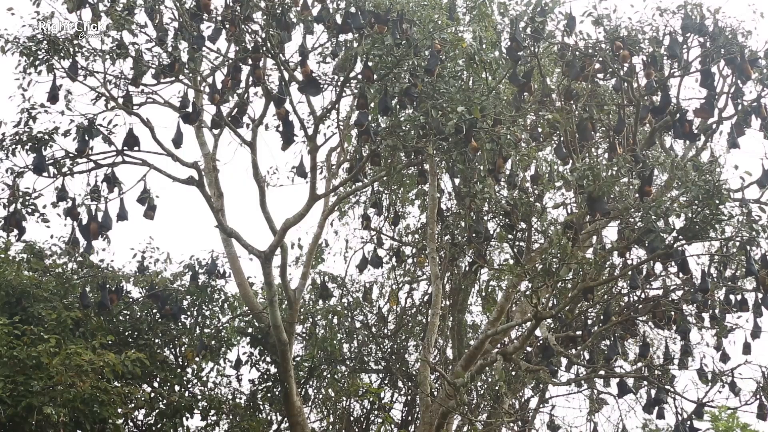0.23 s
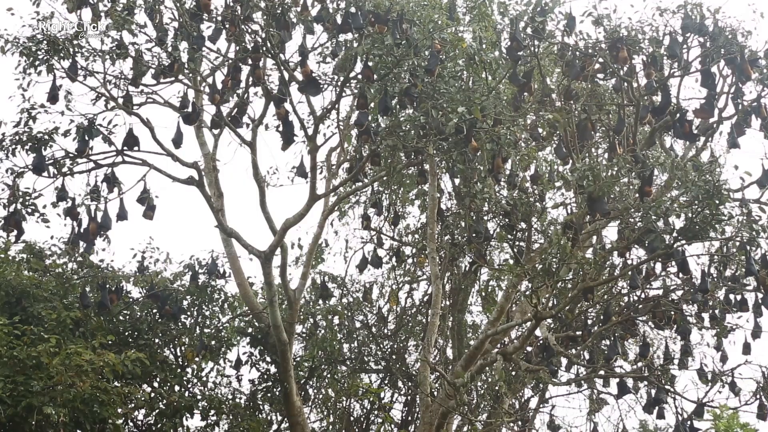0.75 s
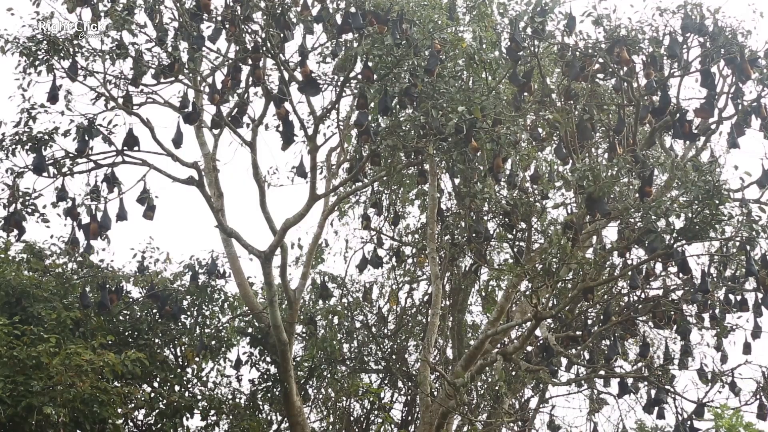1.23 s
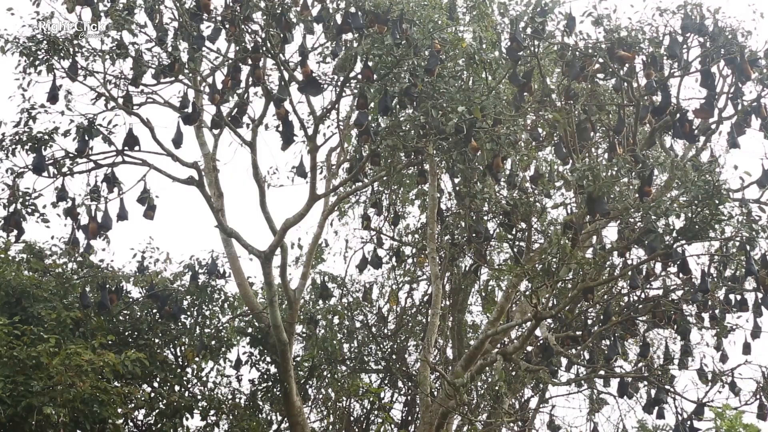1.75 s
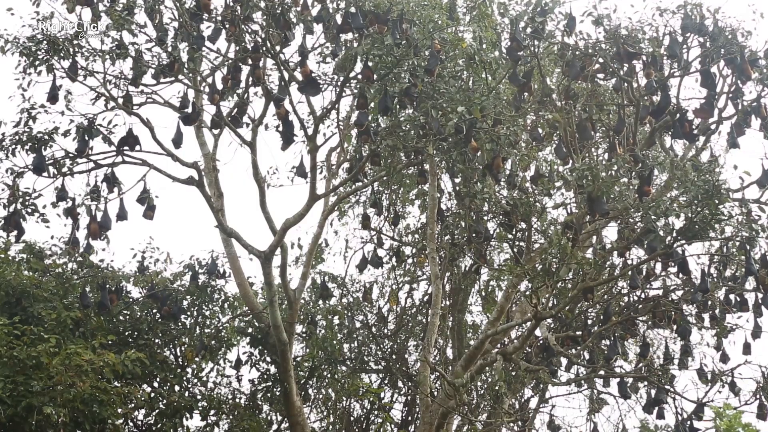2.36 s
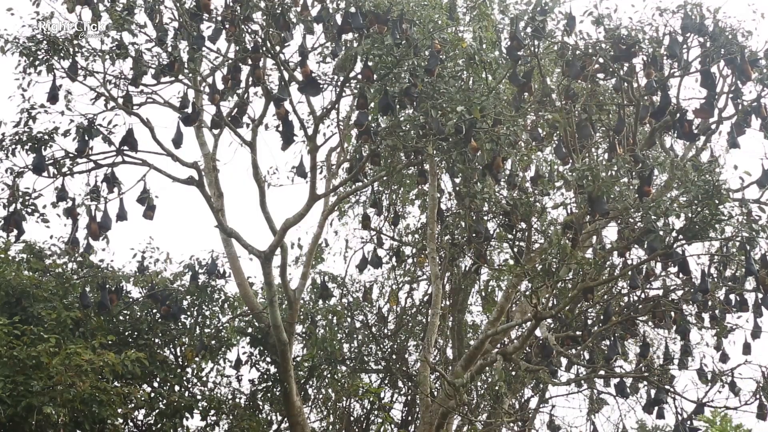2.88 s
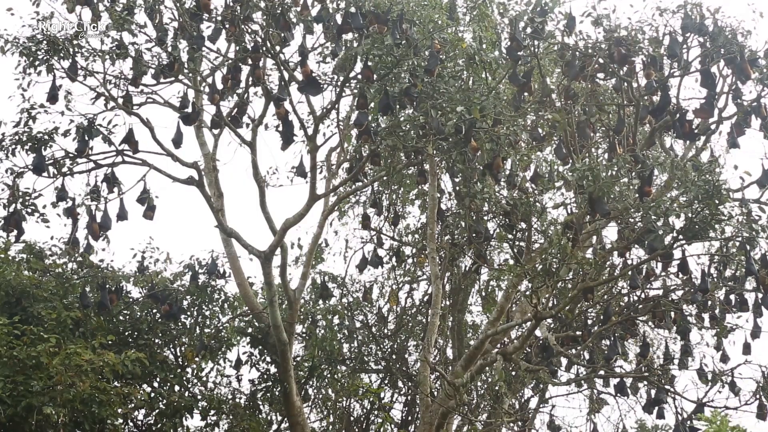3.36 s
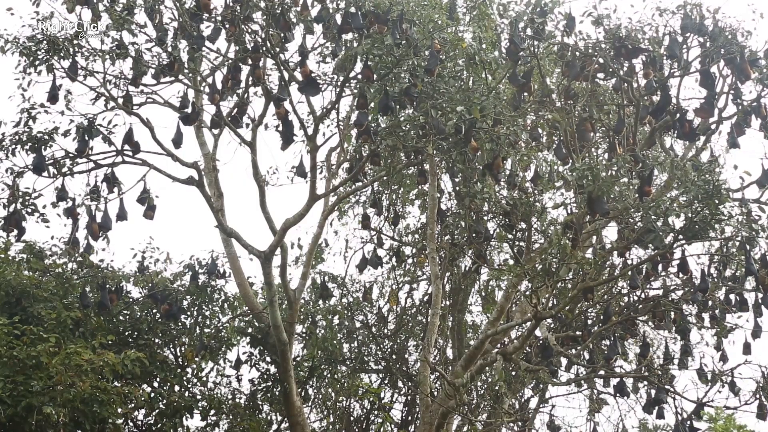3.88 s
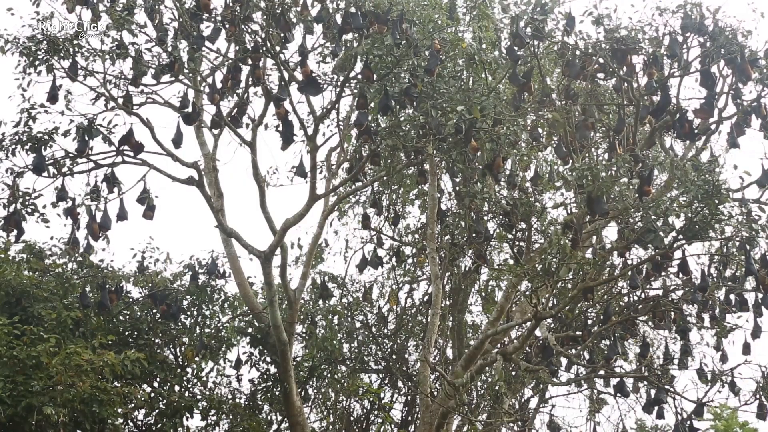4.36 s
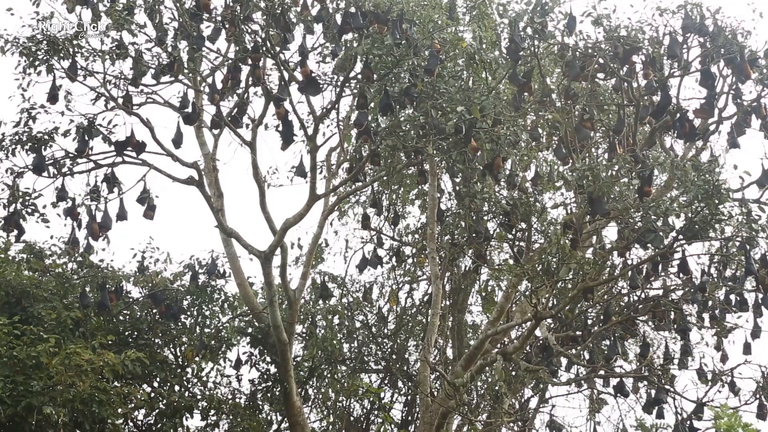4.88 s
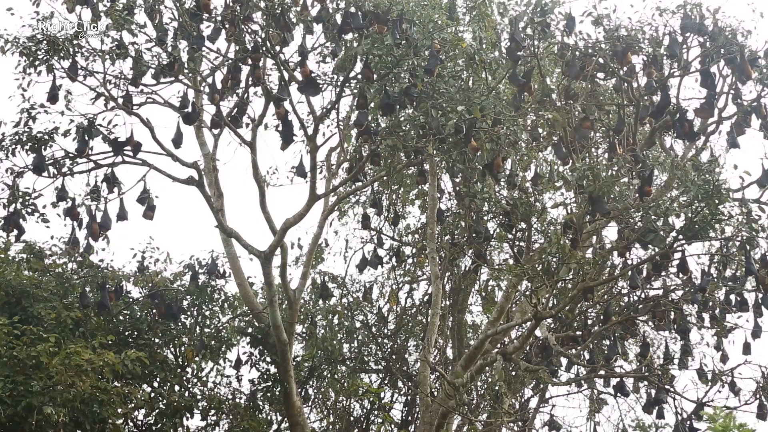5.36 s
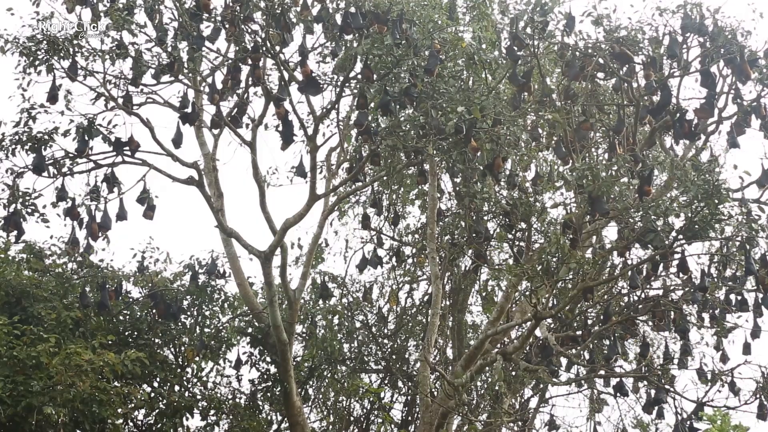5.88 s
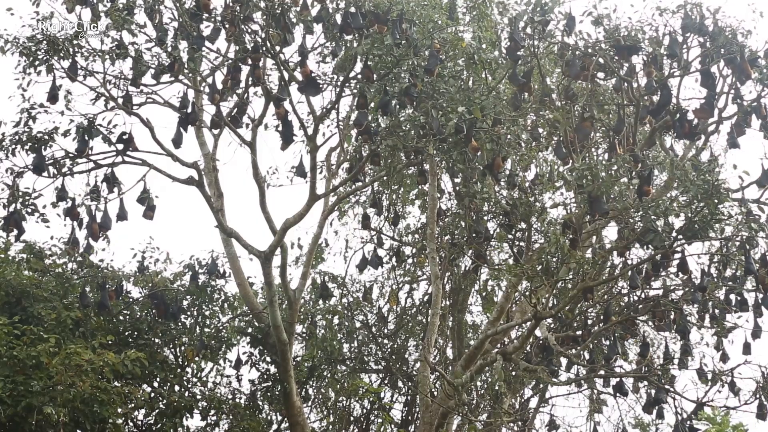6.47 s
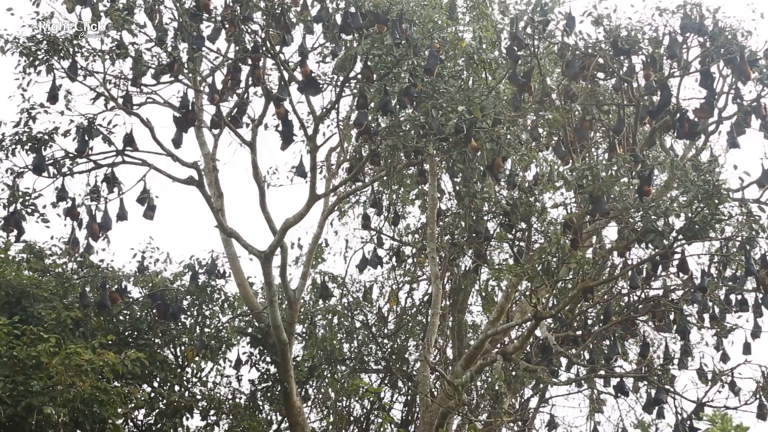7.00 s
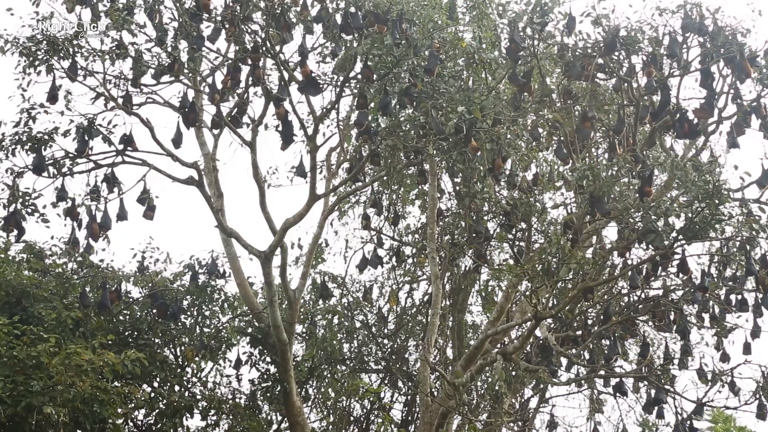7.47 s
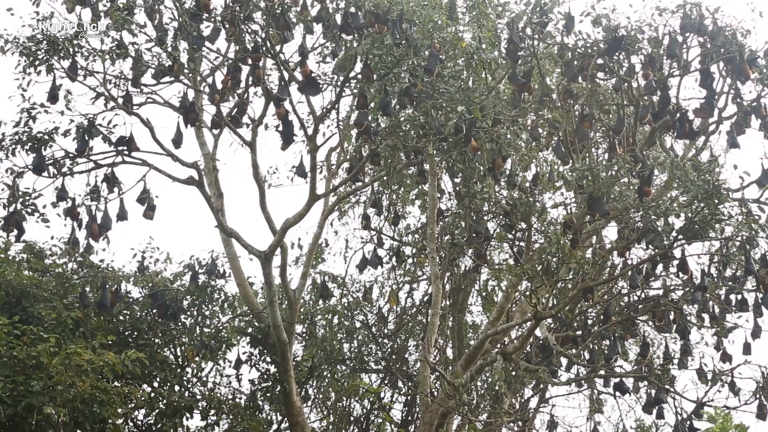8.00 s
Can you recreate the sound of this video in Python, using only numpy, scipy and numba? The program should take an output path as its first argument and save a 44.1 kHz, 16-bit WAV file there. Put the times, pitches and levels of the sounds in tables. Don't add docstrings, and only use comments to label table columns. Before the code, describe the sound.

A fruit bat roost outdoors, heard in mono from below, with steady high cicada buzz, soft air, distant traffic and a blurred far colony throughout. A bat mutters faintly, chirps upward at 0.2 s with a raspy open screech, and whistles downward at 0.5. A wavering chirp and muttering run from 0.7, then a loud bark near 1.05 and a long, piercing screech from 1.3 to 1.8. A short call at 1.95 leads to a quieter gap with faint whistles. From 2.3 a second, hoarser bat takes over: harsh screeches at 2.9, 3.3 and 3.9, strongest around 4.5, with low grunts between. Squeals and a falling whistle appear around 4.9 to 5.2, a lower rough caw at 5.4, softer squeals near 5.8. Choppier, weaker cries follow around 6 to 7, swelling again at 7.3 to 8, with a grunt and final bark around 8.2. Leaves give a brief, dense echo.

```python
import sys
import numpy as np
from scipy import signal
from scipy.io import wavfile
from scipy.ndimage import uniform_filter1d
from numba import njit

SR = 44100
rng = np.random.default_rng(int(sys.argv[2]) if len(sys.argv) > 2 else 0)


def linear_from_db(decibels):
    return 10 ** (np.asarray(decibels, float) / 20)


def inscribe(sig):
    pcm = np.round(np.clip(np.atleast_2d(sig).T, -1, 1) * 32767)
    wavfile.write(sys.argv[1], SR, pcm.astype(np.int16))


N = 362942

# (time [s], third partial [Hz], its level [dB])
SQUEALS = [
    [(2.765, 3900, -60), (2.83, 3880, -60)],
    [(4.893, 4150, -47), (4.93, 3900, -45), (4.978, 3960, -46)],
]
SOFT_SQUEALS = [
    [(5.725, 4100, -49), (5.79, 4050, -50)],
    [(5.838, 4300, -48), (5.89, 4450, -48)],
]

SMALL_HEAD_HZ = 1390
EFFORT_DB = -30
BARK_DB_PER_S, SURGE_DB_PER_S = 1700.0, 330
RELEASE_DB_PER_S, SAG_DB_PER_S = 376, 4.5


def level(x, db):
    return x * linear_from_db(db) / np.sqrt(np.mean(x ** 2))


def walk(rate):
    k = int(SR / rate)
    steps = np.repeat(rng.standard_normal(N // k + 1), k)
    return 1.3 * uniform_filter1d(uniform_filter1d(steps, k), k)[:N]


@njit
def svf(x, hz, width):
    y, b, l = np.empty(len(x)), 0., 0.
    for i in range(len(x)):
        g = np.tan(np.pi * hz[i] / SR)
        k = width / hz[i]
        v = (b + g * (x[i] - l)) / (1 + g * (g + k))
        b, l, y[i] = 2 * v - b, l + 2 * g * v, k * v
    return y


def ring(x, modes, patchy_db=0):
    out = 0
    for k, (hz, width_hz, db) in enumerate(modes):
        centre = np.full(N, float(hz))
        once = svf(x, centre, float(width_hz))
        twice = svf(once, centre, float(width_hz))
        flicker = patchy_db * walk(45)
        out = out + (-1) ** k * linear_from_db(db + flicker) * level(twice, 0)
    return out


def play(calls, fade_s=0.0052):
    t = np.arange(N) / SR
    gate = sum(np.clip(np.minimum(t - c[0][0], c[-1][0] - t) / fade_s, 0, 1) for c in calls)
    s, *columns = np.concatenate(calls).T
    order = np.argsort(s)
    return [gate] + [np.interp(t, s[order], c[order]) for c in columns]


def tone(calls, partials, tracked, wobble=0.0054):
    gate, hz, db = play(calls)
    phase = 2 * np.pi * np.cumsum(hz * (1 + wobble * walk(150))) / (tracked * SR)
    stack = sum(linear_from_db(p_db + 2.8 * walk(60)) * np.sin(k * phase) for k, p_db in partials)
    return gate * linear_from_db(db) * np.sqrt(2) * stack


@njit
def snaps(hz, stretch, size):
    pulses, phase, p, k = np.zeros(len(hz) + 1), np.empty(len(hz)), 0., 0
    for i in range(len(hz)):
        step = hz[i] * stretch[k] / SR
        p += step
        if p >= 1:
            p, k = p - 1, k + 1
            pulses[i] += size[k] * p / step
            pulses[i + 1] += size[k] * (1 - p / step)
        phase[i] = p
    return pulses[:-1], phase


def folds(hz, jitter, weak_db, scatter_db):
    cycles = N // 40
    chance = np.tanh(rng.standard_normal((cycles, 2)).T)
    bouts = np.repeat(rng.random(cycles), 9)[:cycles]
    chance = chance * (.35 + 1.5 * bouts ** 2)
    size = linear_from_db(scatter_db * chance[1] + weak_db * (np.arange(cycles) % 2))
    pulses, phase = snaps(hz, np.clip(1 + jitter * chance[0], .5, 2), size)
    puffs = linear_from_db(2.05 * walk(25)) * np.exp(-phase / 0.92) * rng.standard_normal(N)
    return -level(pulses, 0), level(puffs, 0)


def air():
    # (frequency [Hz], level [dB per Hz])
    air_colour = [(20, -32), (45, -5), (100, -4), (300, -4), (700, -3), (1500, -6.5), (3300, -8.5),
                  (6000, -8), (9000, -14.5), (10200, -24.5), (13000, -18.5), (15800, -25.5)]
    # (centre [Hz], width [Hz], level [dB])
    far_roost = [(2540, 430, -57.5), (4120, 100, -76.5), (315, 104, -65), (510.4, 94, -65)]
    out, (hz_at, db_at) = 0, np.transpose(air_colour)
    for hz in 30 * 2 ** np.arange(0, 9.1, 1 / 3):
        db = np.interp(np.log(hz), np.log(hz_at), db_at) + 10 * np.log10(hz) + 1.7 * walk(9)
        out = out + linear_from_db(db) * ring(rng.standard_normal(N), [(hz, hz * 0.49, 0)])
    roost = sum(linear_from_db(2.5 * walk(5)) * ring(rng.standard_normal(N), [m]) for m in far_roost)
    return level(out, -47) + roost


def cicadas():
    # (centre [Hz], width [Hz], level [dB])
    bodies = [(5237, 480, -49), (8640, 1280, -46.5), (6960, 880, -52.5)]
    out = 0
    for body in bodies:
        clicks = (rng.random(N) < 900 / SR) * rng.standard_normal(N)
        clicks = clicks + 0.28 * rng.standard_normal(N)
        out = out + linear_from_db(0.16 * walk(1.8) + 1.9 * walk(40)) * ring(clicks, [body])
    return out


def leaf_echo(bats):
    t = np.arange(SR // 4) / SR
    t60_s = 0.096
    leaves = rng.standard_normal(len(t)) * linear_from_db(-60 * t / t60_s) * np.clip(t / 0.001, 0, 1)
    echo = signal.fftconvolve(bats, leaves / np.sqrt(np.sum(leaves ** 2)))[:N]
    return linear_from_db(-6) * echo


def caw():
    # (time [s], second partial [Hz], level [dB])
    caw_path = [
        [(5.36, 1030, -54), (5.42, 1188, -50), (5.5, 1105, -53), (5.58, 975, -55), (5.615, 826, -57),
         (5.64, 800, -63)],
    ]
    # (multiple, level [dB])
    caw_partials = [(1.8, -5), (2, 0), (2.5, -8), (3, -2), (3.5, -5), (4, -4), (8, -9)]
    return tone(caw_path, caw_partials, tracked=2)


def whistles():
    # (time [s], frequency [Hz], level [dB])
    whistle_paths = [
        [(0.5, 2720, -44), (0.53, 2680, -42), (0.565, 2480, -45)],
        [(2.15, 4060, -58), (2.24, 4000, -60)],
        [(2.605, 4400, -56), (2.65, 4430, -53), (2.69, 4250, -54)],
        [(5.105, 4400, -54), (5.14, 3700, -51), (5.18, 3150, -51)],
    ]
    return tone(whistle_paths, [(1, 0)], tracked=1)


def chirps():
    # (time [s], frequency [Hz], level [dB])
    chirp_paths = [
        [(0.17, 2370, -40), (0.184, 2457, -37), (0.215, 2740, -33)],
        [(0.735, 2980, -45), (0.84, 2930, -44), (0.885, 2980, -38), (0.91, 2900, -45), (1.03, 2860, -42),
         (1.19, 2760, -47)],
    ]
    return tone(chirp_paths, [(1, 1.0), (2, -12), (3, -19)], tracked=1, wobble=0.0157)


def grunts():
    # (start [s], level [dB], length [s], fold rate [Hz])
    in_breaths = [(1.122, -40, 0.085, 180.4), (3.176, -36, 0.078, 171), (3.676, -40.5, 0.067, 170.6),
                  (4.217, -38, 0.045, 177.2), (4.678, -41, 0.082, 176.7), (5.929, -39.5, 0.057, 180.5),
                  (6.105, -48, 0.14, 174.5), (7.194, -34.5, 0.08, 174.3), (8.035, -37, 0.15, 177)]
    gulp = [
        (1.92, -38.5, 0.014, 173.5),
    ]
    # (centre [Hz], width [Hz], level [dB])
    grunt_throat = [(504, 530, -3.5), (1015, 340, -2), (2340, 2400, 5)]
    t = np.arange(N) / SR
    s, db, length, hz = np.transpose(sorted(in_breaths + gulp))
    shape = 0
    for start, d, n in zip(s, db, length):
        shape = shape + linear_from_db(d - 9.0) * np.sin(np.pi * np.clip((t - start) / n, 0, 1)) ** 2
    flaps, puffs = folds(np.interp(t, s, hz), 0.033, 0, 0.72)
    return shape * ring(flaps + 1.25 * puffs, grunt_throat)


def squeals():
    # (multiple, level [dB])
    squeal_partials = [(1, -9), (2, -1), (3, 0), (4, 2), (5, -14), (6, -3), (7, -15), (8, -11), (9, -14),
                       (10, -17)]
    # (multiple, level [dB])
    soft_partials = [(1, -9), (2, 1), (3, 0), (4, -8)]
    clean = tone(SQUEALS, squeal_partials, tracked=3)
    return clean + tone(SOFT_SQUEALS, soft_partials, tracked=3)


def effort(rows, rise):
    ms = np.arange(0, N / SR + 1 / 1000, 1 / 1000)
    s, held, db, *mouth = (c[:, None] for c in np.transpose(rows))
    shape = np.minimum(rise[:, None] * (ms - s), -SAG_DB_PER_S * (ms - s))
    release = RELEASE_DB_PER_S * np.clip(ms - s - held, 0, None)
    power = linear_from_db(2 * (db + shape - release))
    total = power.sum(axis=0)
    curves = [10 * np.log10(total)] + [(power * c).sum(axis=0) / total for c in mouth]
    return [np.interp(np.arange(N) / SR, ms, c) for c in curves]


def screech(curves, source, breath, chest, rasp, low_width_hz, high_width_hz):
    gate, db, low_hz, high_hz, nose_db, high_db, rasp_db = curves
    low_hz = low_hz * (1 + .012 * walk(60))
    high_hz = high_hz * (1 + .02 * walk(60))
    pulses, puffs = source
    deep, airy = pulses + breath * puffs, pulses + 2.44 * breath * puffs
    low = svf(svf(deep, low_hz, low_width_hz), low_hz, 3 * low_width_hz)
    low = level(low, -0.32) - ring(deep, chest, patchy_db=3.0)
    nose = -ring(airy, [(3940, 1180, -2)], patchy_db=4.0)
    high = svf(svf(airy, high_hz, high_width_hz), high_hz, 3 * high_width_hz)
    high = linear_from_db(1.35 * walk(40)) * level(high, 0)
    voice = low + linear_from_db(nose_db) * nose + linear_from_db(high_db) * high
    voice = voice - linear_from_db(rasp_db) * ring(airy, rasp, patchy_db=1.5)
    head = signal.butter(6, SMALL_HEAD_HZ, "high", fs=SR, output="sos")
    voice = signal.sosfilt(head, voice)
    size = uniform_filter1d(np.abs(voice), SR // 50)
    band = signal.butter(3, [SMALL_HEAD_HZ, 8000], "band", fs=SR, output="sos")
    voice = voice - .14 * signal.sosfiltfilt(band, voice ** 2 / size)
    return gate * linear_from_db(db + 0.7 * walk(22)) * voice


def first_jaw():
    # (full strength [s], held [s], level [dB], low throat [Hz], high throat [Hz])
    pushes = [
        (0.0, .04, -47, 2900, 4500),
        (0.65, .03, -37, 2900, 4700),
        (1.037, .05, -25.5, 3100, 4650),
        (1.238, .01, -36, 3260, 4800),
        (1.26, .035, -31, 3290, 4650),
        (1.31, .46, -29.5, 3290, 4760),
    ]
    open_call = [
        (0.175, .02, -44, 2750, 4200),
        (0.206, .08, -32, 3000, 4500),
        (0.29, .27, -35.5, 3120, 4520),
    ]
    mutters = [
        (0.065, .03, -35, 2900, 4400),
        (0.115, 0.049, -40.5, 2820, 4330),
        (0.735, .16, -37, 2960, 5500),
        (0.92, .05, -40, 2920, 5400),
        (0.99, 0.028, -35.5, 2820, 5200),
        (1.11, .09, -40, 2860, 4900),
    ]
    short_call = [
        (1.942, 0.056, -38, 2630, 3750),
        (2.02, 0.062, -37, 2800, 4050),
    ]
    moods = (pushes, -4.5), (open_call, -2), (mutters, -11), (short_call, 5)
    rows = [(*r, high_db) for table, high_db in moods for r in table]
    db, low_hz, high_hz, high_db = effort(rows, np.full(len(rows), BARK_DB_PER_S))
    rasp_db = -9.5 - 0.06 * (db - EFFORT_DB)
    return 1, db, low_hz, high_hz, high_db - 3, high_db, rasp_db


def first_bat():
    # (centre [Hz], width [Hz], level [dB])
    rasp_modes = [(6100, 900, -7), (7000, 900, 0), (8400, 1500, -10), (10500, 1300, -15),
                  (12300, 2800, -17)]
    chest_modes = [(2160, 1260, -20.5), (1660, 440, -27.5)]
    source = folds(520 * (1 + .08 * walk(12)), .2, -1.0, 0.87)
    return screech(first_jaw(), source, 0.83, chest_modes, rasp_modes, 460.0, 510.0)


def second_jaw():
    # (full strength [s], held [s], level [dB], low throat [Hz], high throat [dB])
    barks = [(2.315, 0.086, -44, 2480, 5), (2.689, .012, -38, 3250, -10), (2.73, .03, -47, 2440, -8),
             (2.91, .24, -30, 2600, -2), (2.936, 0.018, -30.5, 2750, 8.5), (3.303, .02, -41, 2325, 5),
             (3.327, .325, -31.5, 2660, 0), (3.865, 0.012, -40, 2570, 5), (3.328, 0.023, -26, 2580, 5.5),
             (3.885, .29, -32, 2660, 0), (4.31, 0.055, -28.5, 2670, 1), (4.822, 0.11, -38, 2500, 8),
             (5.177, .03, -36, 2180, 3), (5.345, 0.036, -34, 1800, -3), (5.5, .03, -31, 2000, -5),
             (5.78, 0.011, -34, 2765, -2), (6.013, 0.011, -40, 3060, -1), (6.179, 0.029, -37, 2900, 7.5),
             (6.339, 0.043, -36.5, 2800, 6.5), (6.737, 0.022, -37, 2650, 3.5),
             (7.308, 0.069, -40.5, 2660, 1.5), (8.203, .05, -28, 2800, -2)]
    gradual_surges = [(2.44, .12, -42, 2630, 1.5), (2.79, .02, -45, 2560, 1.5), (3.0, .03, -33, 2770, 4),
                      (3.13, .02, -33, 2330, -6), (3.59, .01, -30, 2700, -4), (3.82, .01, -35, 2680, -1.5),
                      (4.13, .02, -30, 2620, 1.5), (4.345, .015, -29, 2830, 3), (4.4, .045, -36, 2790, 1.5),
                      (4.505, .03, -25, 2550, 0.3), (4.58, .07, -32.5, 2520, -0.3),
                      (4.848, .012, -28, 2530, 0), (4.985, .01, -38, 2480, 2.5),
                      (5.018, .012, -28.5, 2460, -2.5), (5.4, .07, -46, 2000, -5), (5.54, .01, -33, 2450, 0),
                      (5.665, 0.0073, -43.5, 2740, 0.3), (5.74, 0.029, -42, 2730, 4),
                   (5.82, 0.063, -40.5, 2850, 3.5), (5.878, 0.012, -33.5, 2880, 4),
                   (5.94, 0.021, -49, 3050, 0), (6.047, 0.004, -36.5, 2980, 4), (6.1, 0.042, -44, 2860, -1),
                   (6.42, 0.1, -39.5, 3000, 2.5), (6.521, 0.063, -34.5, 2790, 0.5),
                   (6.81, 0.045, -36, 2150, 3), (6.87, .2, -36.5, 2680, 1),
                   (6.94, 0.0067, -32.5, 2620, 2.5), (7.11, .035, -33.5, 2740, 4),
                   (7.338, 0.01, -28.5, 2680, 0.5), (7.42, .28, -35, 2950, 3), (7.5, 0.054, -36, 3400, -9),
                   (7.7, .3, -29.5, 2950, 1), (7.745, 0.0084, -30.5, 2960, 4.5),
                   (7.92, 0.019, -30.5, 2880, -1)]
    surges = gradual_surges
    rise = np.repeat([BARK_DB_PER_S, SURGE_DB_PER_S], [len(barks), len(surges)])
    db, low_hz, high_db, held = effort([(*r, r[1]) for r in barks + surges], rise)
    jaw_khz = (low_hz - 2700) / 1000
    nose_db = -19 + 30 * jaw_khz
    rasp_db = high_db - 12.5 - 0.04 * (db - EFFORT_DB)
    rasp_db = rasp_db + 16 * held + 6 * jaw_khz
    gate = 1 - .65 * play(SQUEALS + SOFT_SQUEALS)[0]
    return gate, db, low_hz, 5600 + 0.55 * (low_hz - 2600), nose_db, high_db, rasp_db


def second_bat():
    # (centre [Hz], width [Hz], level [dB])
    rasp_modes = [(8070, 2330, 1), (9550, 4250, 2.5), (13700, 11000, -22)]
    chest_modes = [(1945, 820, -15.5), (1400, 360, -18)]
    source = folds(480 * (1 + .05 * walk(9)), .11, -4, 3.0)
    return screech(second_jaw(), source, 0.8, chest_modes, rasp_modes, 480.0, 1650.0)


def scene():
    bats = first_bat() + second_bat() + squeals()
    bats = bats + grunts() + chirps() + whistles() + caw()
    mix = bats + leaf_echo(bats) + cicadas() + air()
    return np.tile(mix, (2, 1))


def low_pass(x):
    return signal.sosfilt(signal.butter(12, 16020, fs=SR, output="sos"), x)


def record(dry):
    rounded = np.tanh(1.2 * dry) / 1.2
    return low_pass(rounded)


dry = scene()
out = record(dry)
inscribe(out)
```